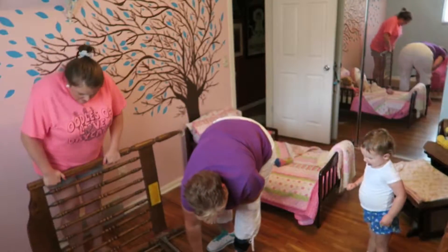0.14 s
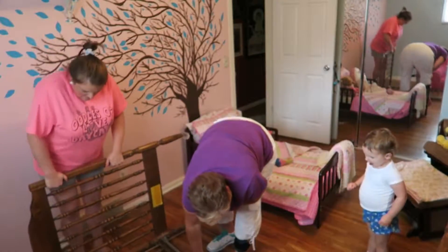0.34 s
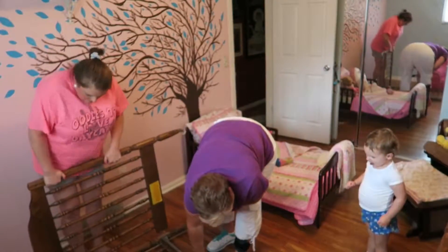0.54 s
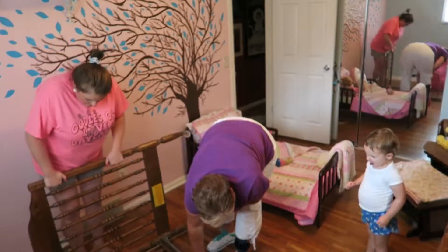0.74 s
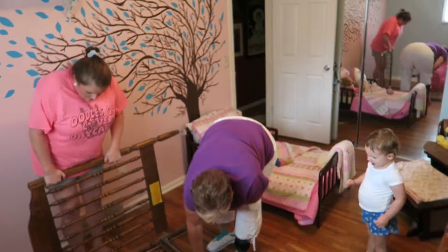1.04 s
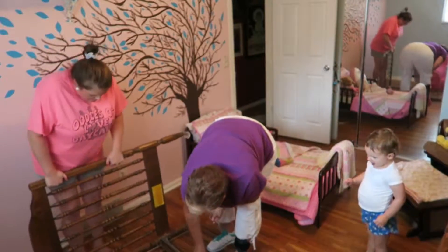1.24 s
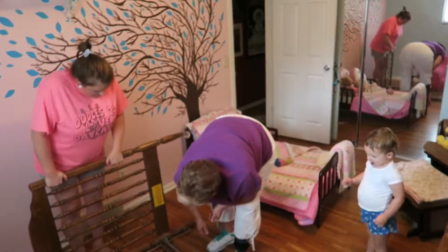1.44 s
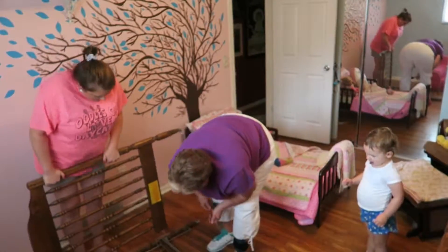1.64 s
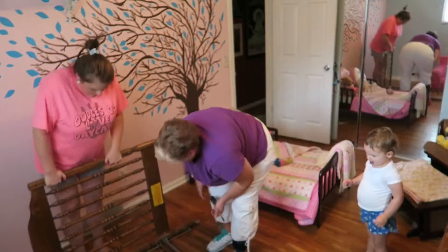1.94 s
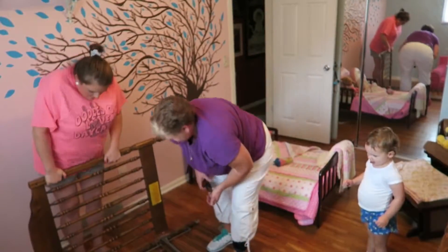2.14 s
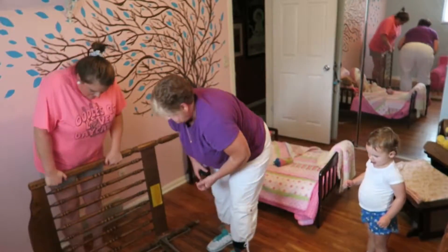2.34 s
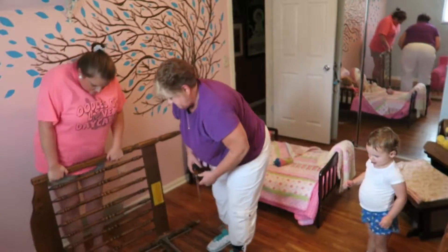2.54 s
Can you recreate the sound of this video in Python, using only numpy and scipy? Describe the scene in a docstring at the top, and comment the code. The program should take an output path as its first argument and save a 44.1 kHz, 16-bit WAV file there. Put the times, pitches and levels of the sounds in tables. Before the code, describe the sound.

Wooden crib parts knock and clatter as the frame thuds on a hollow bedroom floor

```python
"""A wooden crib is pried apart by hand in a bedroom: slats and rails knock, as struck modes with noisy
clatter. The frame bumps a hollow wooden floor (a low boom under ringing boards), loose bolts clink
(thin buzzing modes), a joint creaks (a train of slips) and the frame drags (ticks over a rumble).
Noise tails make the room, over a steady, mostly low hush. A small camera clips the loudest blows."""
import sys
import numpy as np
from scipy import signal
from scipy.fft import rfft, irfft
from scipy.io import wavfile
from scipy.ndimage import uniform_filter1d

SR = 44100
rng = np.random.default_rng(int(sys.argv[2]) if len(sys.argv) > 2 else 0)


def put_to_file(sound):
    """Save the sound as 16-bit audio at rate SR, in the file named by the first command-line argument."""
    columns = np.atleast_2d(sound).T  # one column per channel
    safe = np.clip(columns, -1, 1)
    whole_steps = np.round(safe * 32767)
    wavfile.write(sys.argv[1], SR, whole_steps.astype(np.int16))


N = 119070  # samples


def amp(db):
    """Amplitude ratio of a level in dB."""
    return 10 ** (np.asarray(db) / 20)


def evened(x):
    """Scales x to an RMS of 1."""
    return x / np.sqrt(np.mean(x ** 2) + 1e-20)


def peaked(x):
    """Scales x to a peak of 1."""
    return x / np.abs(x).max()


def read(points, hz):
    """Interpolates (Hz, value) points along log frequency."""
    point_hz, value = np.transpose(points)
    return np.interp(np.log(hz + 1), np.log(point_hz + 1), value)


def add(mix, start_s, sound):
    """Adds sound into mix, cut off at the end of mix."""
    part = mix[round(start_s * SR):][:len(sound)]
    part += sound[:len(part)]


def colour(x, points):
    """Shapes x by a spectrum in dB."""
    gain = amp(read(points, np.fft.rfftfreq(x.shape[-1], 1 / SR)))
    return irfft(rfft(x) * gain, x.shape[-1])


def band(x, lo_hz, hi_hz):
    """Band-pass filter."""
    return signal.sosfilt(signal.butter(3, [lo_hz, hi_hz], "band", fs=SR, output="sos"), x)


def near(modes, hz, reach):
    """Weight in dB of each mode: a bell around the struck pitch, reach = its spread in log frequency."""
    return -4.3 * (np.log(np.array(modes)[:, :1] / hz) / reach) ** 2


def ring(modes, weight_db, t):
    """Sum of exponentially dying modes with chance phases."""
    hz, db, t60_s = np.array(modes).T[:, :, None]
    phase = 2 * np.pi * rng.random((len(modes), 1))
    level = amp(db + weight_db - 60 * t / t60_s)
    return (level * np.sin(2 * np.pi * hz * t + phase)).sum(0)


def buzz(t, depth):
    """Quick uneven flutter of level: noise smoothed twice."""
    smooth = uniform_filter1d(uniform_filter1d(rng.standard_normal(len(t)), 120), 120)
    return 1 + depth * evened(smooth)


def knock(start_s, db, hz, clatter_db, low_mid_db, treble_db, contact_s):
    """Wood on wood: a contact rings the modes near the struck pitch, with rough broad clatter around it."""
    # Modes of rails and slats. Each row: frequency in Hz, relative level in dB, t60 in seconds.
    wood = [(1053, 7.5, 0.16), (1232, 1.5, 0.4), (1331, 16, 0.065), (1804.4, 8.5, 0.046), (2064, 10, 0.014),
            (2272, 1.5, 0.042), (2557, 1.5, 0.028), (2695, -8, 0.069), (2881, 2.5, 0.055),
            (3090, 3.5, 0.019), (3603, 3, 0.042)]
    # Spectrum of the clatter. Each row: frequency in Hz, relative level in dB.
    clatter_spectrum = [(400, -18.5), (900, -5.5), (1500, 2), (2600, 3.5), (3500, -4.5), (4500, -11.5),
                        (6000, -35.5)]
    low_mid_hz, treble_hz, air_hz, air_db = (430, 1050), (3400, 7400), (7400, 13150), -7.5
    rise_s, reach, joint_buzz = 0.0017, 0.14, .45

    t = np.arange(SR // 4) / SR
    rise = 1 - np.exp(-(t / rise_s) ** 2)
    touch = rng.standard_normal((3, len(t))) * np.exp(-t / max(contact_s, 5e-4)) * rise
    modes = rise * buzz(t, joint_buzz) * ring(wood, near(wood, hz, reach), t)
    clatter = colour(touch[0], clatter_spectrum)
    low_mid = band(touch[1], *low_mid_hz)
    treble = band(touch[2], *treble_hz) + amp(air_db) * band(touch[2], *air_hz)
    sound = (peaked(modes) + amp(clatter_db) * peaked(clatter)
             + amp(low_mid_db) * peaked(low_mid) + amp(treble_db) * peaked(treble))
    return start_s, amp(db) * sound


def thud(start_s, db, hz, t60_s, boards_db, boards_hz):
    """The hollow floor booms at one pitch while the boards ring above it."""
    # Modes of floor boards and panels. Each row: frequency in Hz, relative level in dB, t60 in seconds.
    floor_modes = [(119.9, -1, 0.39), (158.3, 1, 0.18), (204.8, -3.5, 0.18), (248.2, 1.5, 0.14),
                   (288.4, -1.5, 0.31), (313.1, -6.5, 0.2), (338.1, -4.5, 0.24), (375, 1, 0.12),
                   (467, -3, 0.085), (630, -3.5, .08)]
    boom_rise_s, boards_rise_s, reach = 0.006, 0.0033, 0.33

    t = np.arange(SR // 2) / SR
    decay = amp(-60 * t / np.clip(t60_s, .03, .45))
    boom = decay * np.sin(2 * np.pi * hz * t) * (1 - np.exp(-(t / boom_rise_s) ** 2))
    boards = ring(floor_modes, near(floor_modes, boards_hz, reach), t) * (1 - np.exp(-t / boards_rise_s))
    return start_s, amp(db) * (boom + amp(boards_db) * peaked(boards))


def clink(start_s, db, hz):
    """A loose bolt rings thinly and buzzes in its thread."""
    # Modes of a bolt. Each row: frequency in Hz, relative level in dB, t60 in seconds.
    bolt = [(4300, -8, .05), (6010, 1, .11), (6885, -7, .13), (9210, 0, .1), (10930, 0, .07)]
    rise_s, reach, thread_buzz = 0.0031, .16, .75

    t = np.arange(SR // 4) / SR
    modes = ring(bolt, near(bolt, hz, reach), t)
    return start_s, amp(db) * modes * buzz(t, thread_buzz) * np.minimum(t / rise_s, 1)


def creak():
    """A joint creaks under load: slightly uneven slips at a gliding rate, coloured by the joint."""
    # Course of the creak. Each row: time in seconds, slips per second, level in dB.
    creak_course = [(.522, 245, -31), (0.53, 243, -14), (.545, 232, -22), (.560, 200, -17.5),
                    (0.578, 198, -17.5), (0.606, 194, -15), (0.616, 250, -41)]
    # Resonance of the joint. Each row: frequency in Hz, relative level in dB.
    joint = [(300, 1), (600, -3.5), (950, -4.5), (1220, 3.5), (1450, -2), (2000, -34), (4000, -17.5)]
    slip_jitter = .025  # RMS fraction of the rate

    s, slips_per_s, db = np.transpose(creak_course)
    t = np.arange(s[0], s[-1], 1 / SR)
    wobble = evened(uniform_filter1d(rng.standard_normal(len(t)), 200))
    turns = np.cumsum(np.interp(t, s, slips_per_s) * (1 + slip_jitter * wobble)) / SR
    # the k ** 2 phase spreads each slip in time
    slips = sum(np.cos(2 * np.pi * k * turns + 0.261 * k ** 2) for k in range(1, 16))
    return s[0], amp(np.interp(t, s, db)) * evened(colour(slips, joint))


def drag():
    """The frame drags: dense small ticks in the joints over a lumpy rumble of the floor."""
    # Course of the drag. Each row: time in seconds, rattle level in dB, rumble level in dB.
    drag_course = [(0, -34.5, -28.5), (0.198, -45, -29), (.5, -37, -22.5), (.95, -47, -33),
                   (1.381, -46.5, -38), (1.452, -72, -46), (1.7, -60, -41.5), (1.76, -34, -16.5),
                   (1.97, -58, -42), (2.05, -41.5, -30), (2.2, -52, -31.5), (2.5, -49.5, -34),
                   (2.7, -41.5, -35)]
    # Spectrum of the ticks. Each row: frequency in Hz, relative level in dB per Hz.
    rattle_spectrum = [(250, -13.5), (450, -1.5), (1500, 3), (2700, 3), (4000, -6), (12000, -30),
                       (16000, -59)]
    # Spectrum of the rumble. Each row: frequency in Hz, relative level in dB per Hz.
    rumble_spectrum = [(25, -22), (55, 6), (105, 0.5), (300, -9), (500, -23), (1100, -59.5)]
    ticks_per_s = 8000

    s, rattle_db, rumble_db = np.transpose(drag_course)
    t = np.arange(N) / SR
    chance = rng.random(N) < ticks_per_s / SR
    ticks = evened(colour(rng.standard_normal(N) * chance, rattle_spectrum))
    rumble = evened(colour(rng.standard_normal(N), rumble_spectrum))
    return amp(np.interp(t, s, rattle_db)) * ticks + amp(np.interp(t, s, rumble_db)) * rumble


def room(x):
    """Convolves x with a noise tail whose bands die at their own speed."""
    # Decay of the room. Each row: frequency in Hz, t60 in seconds.
    room_decay = [(60, 0.34), (250, 0.34), (1000, 0.29), (3000, 0.26), (7000, 0.3), (14000, 0.18)]
    predelay_s = .004  # silence, then a fade-in of the same length

    hz, t, z = signal.stft(rng.standard_normal(SR // 2), SR, nperseg=256)
    decay = amp(-60 * t / read(room_decay, hz)[:, None])
    tail = signal.istft(z * decay, SR, nperseg=256)[1]
    tail *= np.clip(np.arange(len(tail)) / (SR * predelay_s) - 1, 0, 1)
    return signal.fftconvolve(x, tail / np.linalg.norm(tail))[:N]


def hush():
    """Steady background: two independent coloured noises."""
    # Spectrum of the background. Each row: frequency in Hz, relative level in dB per Hz.
    hush_spectrum = [(25, 13.5), (70, 17), (125, 32.5), (340, -9.5), (500, -27), (2300, -30),
                     (15000, -65.5)]
    hush_db = -51.5
    return amp(hush_db) * evened(colour(rng.standard_normal((2, N)), hush_spectrum))


def two_ports(direct, centre, side_hush):
    """The left port hears the centre later; room sound and hush of opposite sign make the width."""
    # Spectrum of the side signal. Each row: frequency in Hz, level in dB.
    side_spectrum = [(60, -58), (120, -29.5), (250, -20.5), (700, -14.5), (2400, -20), (4400, -8.5),
                     (8000, -7.5), (15000, -23.5)]
    port_lag_s, wide_db = 2.6e-5, -1.5

    lag = np.exp(-2j * np.pi * np.fft.rfftfreq(N, 1 / SR) * port_lag_s)
    left = irfft(rfft(centre) * lag, N)
    wide = amp(wide_db) * colour(room(direct) + side_hush, side_spectrum)
    return np.array([left + wide, centre - wide])


def scene():
    """Places all blows, then adds drag, room and hush; the knocks feed the centre room more strongly."""
    # Wood on wood. Each row: start in seconds, level in dB, struck pitch in Hz, then clatter, low-mid
    # and treble in dB over the struck modes, contact decay in seconds.
    knock_events = [(.088, -29, 2340, 5, -27, -13, 0.011), (.157, -21.5, 2300, 1.5, -15, -15.5, 0.024),
                    (0.2306, -2, 2750, -10, -21, -19, 0.0038), (.234, -9.5, 1820, -20, -11, -35, 0.0019),
                    (0.2355, -3.5, 2710, -6, -20, -40, 0.0013), (.253, -13, 2650, -17, -7.5, -41, 0.0034),
                    (.328, -18, 1470, 6, -3.5, -11, 0.046), (.349, -9.5, 1760, -0.5, -11, -24, 0.025),
                    (.387, -17, 1220, -7, -3.5, -42, 0.016), (.418, -31, 2300, 6, 7, -13, 0.013),
                    (.538, -22, 2330, 11.5, 7, 0, 0.016), (0.579, -15.5, 3180, 9, -25, -17.5, 0.0068),
                    (.608, -15, 2690, 9.5, 6, -7.5, 0.0031), (.756, -11.5, 2305, -11, -21.5, -58, 0.013),
                    (.777, -32, 2500, 7.5, -16, -7, 0.015), (0.826, -28.5, 2410, 6.5, -0.5, -11, 0.022),
                    (0.969, -14.5, 2580, 2, -8, -40, 0.011), (.975, -7, 2300, 3.5, -28, -7.5, 0.0086),
                    (.980, -6, 2380, 10.5, 3, -2.5, 0.0031), (1.054, -15.5, 2320, -6, -10, -38, 0.0082),
                    (1.188, -24, 2630, -7, -12.5, -8, 0.021), (1.256, -27.5, 2780, -8, -19, -14.5, 0.013),
                    (1.303, -35.5, 1270, 5.5, 1.5, -15.5, 0.026),
                    (1.371, -36.5, 1850, 5.5, -0.5, -16.5, 0.0092),
                    (1.552, -27.5, 1690, -7, -9, -28.5, 0.018), (1.682, -43, 1430, -16, -9.5, -34, 0.006),
                    (1.697, -40, 2800, -6, -15, -11, 0.0065), (1.728, -26, 1420, 7.5, -1, -30, 0.011),
                    (1.75, -23, 2280, 2.5, 3, -13, 0.0053), (1.793, -24.5, 2140, -4, -10, -31, 0.0046),
                    (1.823, -21, 2680, -3, -13.5, -8, 0.016), (1.879, -30, 2600, 0.5, -13, -8, 0.025),
                    (1.996, -31.5, 1260, 4.5, 5.5, -21, 0.017), (2.2096, -5, 2580, -5.5, -21, -18.5, 0.011),
                    (2.229, -16.5, 2080, 2, -0.5, -9.5, 0.013), (2.320, -17, 2700, -6, -14, -10, 0.022),
                    (2.371, -29, 1060, 7.5, 2, -5.5, 0.039), (2.441, -25.5, 2650, -4.5, -13, -12, 0.034),
                    (2.566, -32.5, 1640, 4.5, -8, -29, 0.015),
                    (2.627, -24.5, 2310, -2.5, -31, -17.5, 0.034)]
    # Frame on floor. Each row: start in seconds, boom level in dB, boom pitch in Hz, boom t60 in seconds
    # (held to .03-.45), boards in dB over the boom, boards pitch in Hz.
    thud_events = [(.010, -31, 61.7, 0.34, -8, 148), (0.236, -7.5, 71, 0.16, -10.5, 250),
                   (0.258, -11, 62, 0.65, 0, 214), (0.33, -10.5, 92.6, 0.6, -1, 340),
                   (0.353, -7.5, 74.6, 0.81, -2, 205), (.398, -1, 64, 0.4, -10, 192),
                   (0.53, -16, 57, 0.13, -18, 243), (0.577, -15.5, 70.8, 0.44, 8, 310),
                   (.607, 8, 84.5, 0.11, -12.5, 170), (.678, -19, 104, 0.15, -2.5, 250),
                   (0.757, -16.5, 88.6, 0.17, -11, 273), (.821, -14.5, 63, 0.18, -1, 200),
                   (0.972, 0.5, 68.5, 0.14, -8.5, 212), (0.981, -9, 115, 0.2, 6.5, 290),
                   (1.017, -21.5, 118.5, 0.2, 7.5, 291), (1.102, -21.5, 81.4, 0.33, 2.5, 202),
                   (1.136, -38.5, 69, 0.22, -4, 201), (1.293, -16, 92.5, 0.15, -6.5, 193),
                   (1.35, -21.5, 65.9, 0.21, -17, 250), (1.728, 7, 83.8, 0.077, -16.5, 280),
                   (1.994, -6, 75.2, 0.16, -6.5, 231.5), (2.038, -9, 59, 0.089, -9, 186),
                   (2.2252, 9, 82.5, 0.062, -16.5, 250), (2.289, -10, 83, 0.09, -7.5, 192),
                   (2.363, -10, 76, 0.25, -5.5, 220), (2.409, -14, 95, 0.13, -9, 244),
                   (2.549, -29, 55.6, 0.54, -5, 280)]
    # Loose bolts. Each row: start in seconds, level in dB, struck pitch in Hz.
    clink_events = [(0.092, -36.5, 5560), (.358, -21.5, 6000), (.359, -40, 9800), (0.394, -33.5, 9000),
                    (0.541, -23, 5400), (.582, -33.5, 6250), (0.827, -45, 7360), (1.288, -50, 6980),
                    (1.340, -51, 7170), (1.734, -59, 9600), (2.322, -51, 8100), (2.584, -52, 5950),
                    (2.626, -40, 5900), (2.655, -48, 6000)]
    knock_room_db, other_room_db = -4.5, -14

    knocks, others = np.zeros((2, N))
    for row in knock_events:
        add(knocks, *knock(*row))
    for row in thud_events:
        add(others, *thud(*row))
    for row in clink_events:
        add(others, *clink(*row))
    add(others, *creak())
    direct = knocks + others + drag()
    centre_hush, side_hush = hush()
    reverb = room(amp(other_room_db) * others + amp(knock_room_db) * knocks)
    return two_ports(direct, direct + reverb + centre_hush, side_hush)


def record(dry):
    """The microphone drops the deep bass, the input stage clips at full scale; then the band limit."""
    drive_db, bass_cut_hz, edge_hz = .6, 30.6, 16000
    knee = 14.  # higher = harder clipping
    bass_cut = signal.butter(2, bass_cut_hz, "high", fs=SR, output="sos")
    x = amp(drive_db) * signal.sosfilt(bass_cut, dry)
    clipped = x / (1 + np.abs(x) ** knee) ** (1 / knee)
    band_limit = signal.firwin(101, edge_hz, window=("kaiser", 2), fs=SR)
    return signal.oaconvolve(clipped, band_limit[None], "same")


dry = scene()
out = record(dry)
put_to_file(out)
```